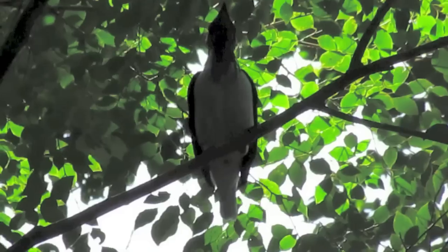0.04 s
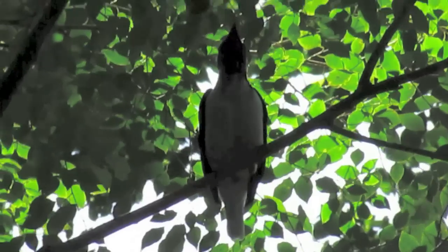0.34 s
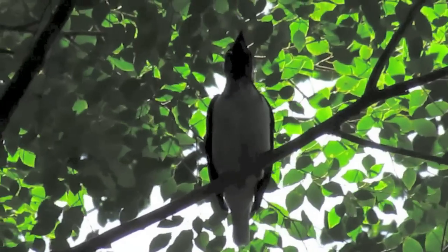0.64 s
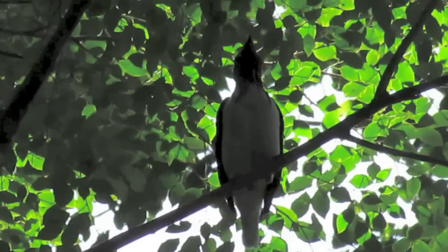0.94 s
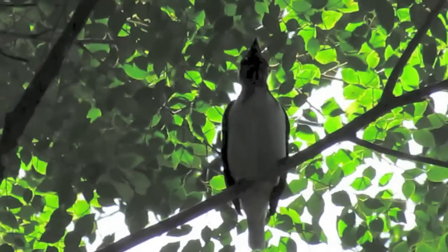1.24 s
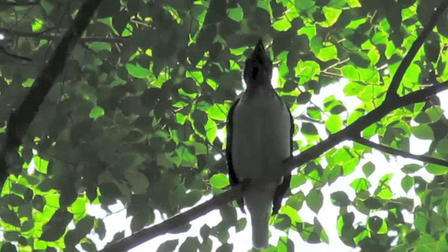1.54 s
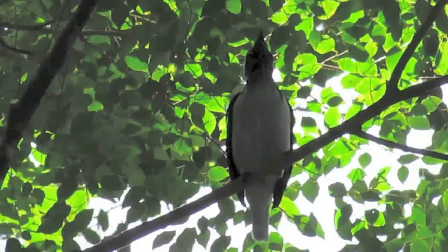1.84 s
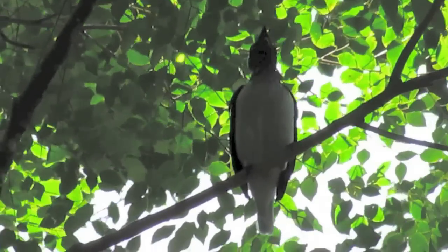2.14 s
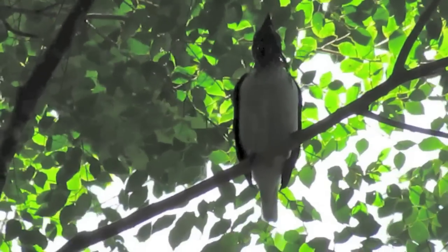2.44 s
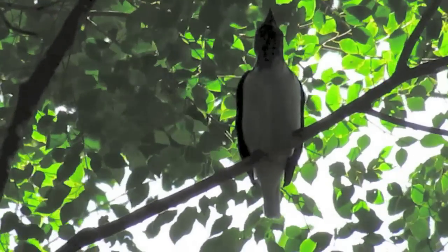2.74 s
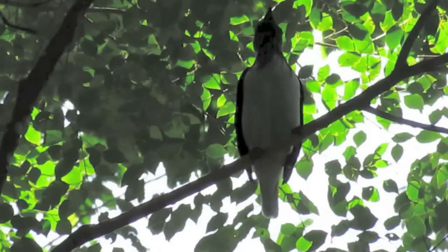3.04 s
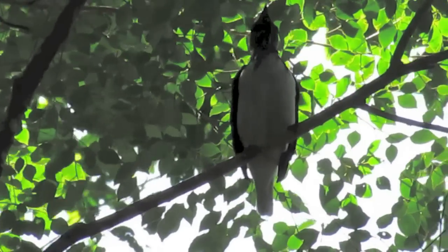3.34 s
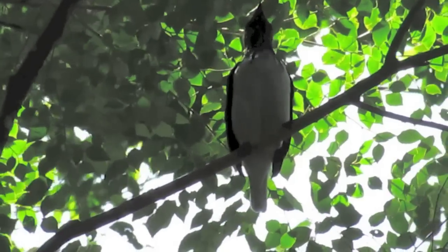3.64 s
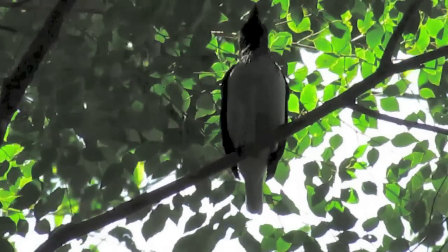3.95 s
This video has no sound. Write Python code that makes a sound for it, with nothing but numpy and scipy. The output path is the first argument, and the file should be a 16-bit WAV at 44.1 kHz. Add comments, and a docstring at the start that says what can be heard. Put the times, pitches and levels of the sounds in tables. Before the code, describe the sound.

A bird clanks loudly twelve times, evenly from about 0.2 to 4 seconds, each call a hard clack with a short metallic ring and forest echo. A quieter bird pipes a short, high note roughly every 0.4 seconds, and a distant one answers faintly until 2.5 seconds. Leaves and insects hiss softly throughout, with two faint, dull knocks near 0.5 and 1.3 seconds.

```python
"""In a forest, a bellbird clanks from a branch about three times a second.
Each clank is a small tick, a hard clack and a short metallic ring of many partials, carried on by the
trees. Another caller pipes one pure note at its own pace, and a third answers far off.
Behind them leaves and insects hiss, and two soft knocks sound among the branches."""
import sys
import numpy as np
from scipy import signal
from scipy.fft import rfft, irfft
from scipy.io import wavfile

SR = 44100
rng = np.random.default_rng(int(sys.argv[2]) if len(sys.argv) > 2 else 0)


def dump(signal):
    """Clip the signal to [-1, 1] and save it as 16-bit WAV at the path in sys.argv[1]."""
    limited = np.clip(np.atleast_2d(signal).T, -1, 1)
    pcm = np.round(limited * 32767).astype(np.int16)
    wavfile.write(sys.argv[1], SR, pcm)


N = 176400
TIME = np.arange(N) / SR

# The bellbird's clanks. Each row: time of the clack in seconds, clack level in dB, ring level in dB.
CLANKS = [(0.2341, -4, -3), (0.5383, -0.5, -0.5), (.861, -1, -0.5), (1.1923, -0.5, 0), (1.536, -0.5, -0.5),
          (1.882, 0.5, -0.5), (2.228, 0, -1.5), (2.5851, 0, 0), (2.9319, -.5, -.5), (3.2868, 0.5, -0.5),
          (3.6356, -1, -1.5), (3.9908, 0.5, -1)]
# The colour of the rasp in its voice. Each row: frequency in Hz, relative level in dB.
RASP_COLOUR = [(300, -48), (800, -25.5), (1100, -11), (1400, -3.5), (1950, -6), (2300, -6.5), (2700, -3.5),
               (3250, -4.5), (3600, -4.5), (4100, -2.5), (4750, -9.5), (5300, -16.5), (8500, -20),
               (11000, -34.5), (15000, -58)]
RASP_DB, RASP_FADE_DB_PER_S, RASP_START_S = -26.5, 29, -.002


def bellbird():
    """Every clank is the same gesture: a clack, then a ring with a noisy rasp on it."""
    tones, rasp_gain = np.zeros((2, N)), np.zeros((2, N))
    t = np.arange(-.025, .2, 1 / SR)   # opens early to leave room for the tick
    rasp_shape = ring_envelope(t, RASP_START_S, RASP_FADE_DB_PER_S)[None]
    for s, clack_db, ring_db in CLANKS:
        add(tones, from_db(clack_db) * clack(t) + from_db(ring_db) * ring(t), s + t[0])
        add(rasp_gain, from_db(ring_db + RASP_DB) * rasp_shape, s + t[0])
    return tones + rasp_gain * diffuse_noise(RASP_COLOUR)


# The tick's three sweeps. Each row: half length in ms, start and end pitch in Hz, level and pan in dB.
TICK_SWEEPS = [(1.5, 3950, 3763, -21, 4.5), (1.7, 2550, 2150, -19.5, -2), (2.0, 1397, 1207, -22.5, 0.5)]
# How far each of them comes ahead of the clack, in ms.
TICK_LEAD_MS = (13.0, 12.2, 9.6)
# The clack and its rebound. Each row: centre and half length in ms, start and end pitch in Hz,
# level and pan in dB.
CLACK_SWEEPS = [(0.53, 2.17, 1273, 1750, -14.5, -1.5), (0.94, 2.26, 2480, 2250, -12, -1),
                (0.14, 2.0, 3520, 3650, -12.5, 3), (2.3, 2.07, 4020, 3820, -18.5, 6.5),
                (8.7, 1.83, 2400, 2100, -22, -2), (9.23, 1.9, 3650, 3430, -22.5, 7)]
BRANCH_ECHO_S, BRANCH_ECHO_DB = .005, -12


def clack(t):
    """Tick and clack: tiny bursts sweep through the voice's three registers, with one close echo."""
    out = 0
    tick = [(-lead_ms, *row) for lead_ms, row in zip(TICK_LEAD_MS, TICK_SWEEPS)]
    for centre_ms, half_ms, start_hz, end_hz, db, pan_db in tick + list(CLACK_SWEEPS):
        u = (t * 1000 - centre_ms) / half_ms
        hz = start_hz + (end_hz - start_hz) * (np.clip(u, -2, 2) + 1) / 2
        burst = np.exp(-u * u / 2 - (u / 2) ** 4)
        out = out + panned(sine(hz) * burst * from_db(db + rng.normal(0, 0.48)), pan_db)
    return out + from_db(BRANCH_ECHO_DB) * np.roll(out, int(BRANCH_ECHO_S * SR), axis=1)


# The metallic ring. Each row: pitch in Hz, level in dB, start in ms after the clack,
# fade in dB per second, pan in dB.
RING_PARTIALS = [(1258, -28, 5.1, 68, -2), (1350, -22, 7.5, 23, 0), (1453, -23.5, 5, 49, -1),
                 (1525, -28.5, 3.4, 107, -9), (1642, -30.5, 11, 107, 3), (1728, -34, 5.2, 110, -7),
                 (2246, -30.5, 3.9, 120, -7), (2316, -32.5, 5, 122, 5), (2310, -32, 6.2, 125, -2),
                 (2965, -29, 6.9, 28, 7), (3082, -21, 7.2, 27, 6.5), (3442, -30.5, 8.5, 107, 6),
                 (3968, -29, 7.6, 85, 9), (4200, -44, 19, 20, -4), (4440, -33.5, 9.5, 24, -1),
                 (4560, -39.5, 10, 11, 6), (4808, -34.5, 24, -3, 10)]
RING_ATTACK_S, RING_HOLD_END_S, RING_RELEASE_S = 0.0026, 0.052, 0.022
RING_SAG_PER_S, PITCH_SCATTER, PITCH_WAVER, PARTIAL_SCATTER_DB = 0.099, .002, 0.0046, 1.27


def ring(t):
    """Close partials beat against each other and sag slightly in pitch."""
    out = 0
    sag = RING_SAG_PER_S * (t - RING_HOLD_END_S / 2)
    for hz, db, start_ms, fade_db_per_s, pan_db in RING_PARTIALS:
        bend = 1 - sag + PITCH_SCATTER * rng.normal() + PITCH_WAVER * drift(t, 150)
        partial = sine(hz * bend) * ring_envelope(t, start_ms / 1000, fade_db_per_s)
        out = out + panned(partial * from_db(db + PARTIAL_SCATTER_DB * rng.normal()), pan_db)
    return out


def ring_envelope(t, start_s, fade_db_per_s):
    """A quick attack, a sloping hold and a short release."""
    release = np.exp(-np.maximum(t - RING_HOLD_END_S, 0) / RING_RELEASE_S)
    return ramp((t - start_s) / RING_ATTACK_S) * from_db(-fade_db_per_s * (t - start_s)) * release


# The second caller's notes. Each row: start in seconds, length in seconds, level in dB.
NEAR_NOTES = [(0.138, 0.083, -24), (.519, 0.08, -21.5), (0.906, 0.096, -22), (1.29, 0.088, -20.5),
              (1.668, 0.091, -20), (2.045, 0.098, -20.5), (2.431, 0.075, -18), (2.827, 0.074, -18.5),
              (3.208, .082, -19.6), (3.595, .082, -19.2)]
# The far answers. Each row: start in seconds, length in seconds, level in dB.
FAR_NOTES = [(.16, 0.079, -33.5), (.6, 0.088, -34), (1.05, 0.064, -38), (1.49, 0.091, -38),
             (1.61, .07, -41), (1.95, 0.092, -39), (2.41, 0.047, -37)]
NEAR_HZ, FAR_HZ, PIPE_ARCH_HZ = 2888.3, 2710, 54
PIPE_ECHO_S, PIPE_ECHO_DB, PIPE_SEND_DB = .11, -17.5, -0.5


def piper(notes, top_hz, pan_db):
    """A caller pipes pure, slightly unsteady notes that arch a little in pitch, each with one echo."""
    out = np.zeros((2, N))
    for s, length_s, db in notes:
        u = np.arange(int(length_s * SR)) / (length_s * SR)
        hz = top_hz - PIPE_ARCH_HZ * (2 * (u - .38)) ** 2 + 9 * drift(u, 14.8)
        waver = drift(u, 12.8)
        envelope = ramp(u / .24) * ramp((1 - u) / 0.28) * from_db(db + 1.8 * (waver - waver.mean()))
        note = sine(hz) * envelope
        add(out, panned(note, pan_db), s)
        add(out, panned(note, 0) * from_db(PIPE_ECHO_DB), s + PIPE_ECHO_S)
    return out


# The colour of the sound the trees scatter. Each row: frequency in Hz, level in dB.
TAIL_COLOUR = [(500, -17), (1250, -12), (1360, -12.5), (1450, -3.5), (1700, -5), (2300, -8.5), (2880, -6),
               (3080, -7), (3600, -4), (4000, -6), (4500, -3.5), (4800, 2), (5500, 5), (8000, 2.5)]
# How long it hangs on. Each row: frequency in Hz, seconds to fall by 60 dB.
TAIL_T60 = [(500, 0.81), (1400, 0.92), (2400, 1), (3500, 1.25), (4800, 0.98), (9000, 0.23)]
PREDELAY_S, TAIL_BUILD_S, LEAF_SWAY_S = 0.022, 0.019, .36


def forest_tail():
    """Trunks and leaves return a dense tail that dies band by band."""
    t, edges = TIME[:SR], np.geomspace(400, 14000, 11)
    hz = np.arange(len(t) // 2 + 1) * SR / len(t)
    white = diffuse_noise([(20, 0), (20000, 0)])[:, :len(t)]
    spectrum = rfft(white) * from_db(at_hz(TAIL_COLOUR, hz))
    build = ramp((t - PREDELAY_S) / TAIL_BUILD_S)
    tail = 0
    for low, high in zip(edges, edges[1:]):
        band = irfft(spectrum * ((hz >= low) & (hz < high)), len(t))
        envelope = build * from_db(-60 * t / at_hz(TAIL_T60, np.sqrt(low * high)))
        tail = tail + band * envelope / np.linalg.norm(envelope)
    return tail


def forest(calls, patterns=4):
    """The foliage moves, so the calls fade from one pattern of reflections into the next."""
    out = 0
    for k in range(patterns):
        away = np.abs((TIME / LEAF_SWAY_S - k + patterns / 2) % patterns - patterns / 2)
        send = calls.mean(0) * np.sqrt(ramp(1 - away))   # equal-power crossfade
        out = out + signal.fftconvolve(send[None], forest_tail(), axes=1)[:, :N]
    return out


# The bed of leaves and insects. Each row: frequency in Hz, relative level in dB.
HISS_COLOUR = [(25, -5), (60, -5), (120, -7), (300, -4), (800, -5.5), (1150, -4), (1600, 4), (2000, -0.5),
               (2900, 7), (3700, 7.5), (4500, 2.5), (5300, -3), (6100, -2), (7000, -4), (9000, -4.5),
               (10500, -15.5), (12400, -16), (14500, -29)]
HISS_DB, HISS_START_S, HISS_RISE_S = -37.5, 0.092, 0.094


def hiss():
    """Leaves and insects make a nearly steady bed that fades in at the start."""
    leaves = from_db(HISS_DB + 0.58 * drift(TIME, 5.64)) * diffuse_noise(HISS_COLOUR)
    fade_in = np.clip((TIME - HISS_START_S) / HISS_RISE_S, 0, 1)
    return (leaves + insect_buzz()) * fade_in


# The shrill top of the insects. Each row: frequency in Hz, relative level in dB.
BUZZ_COLOUR = [(5000, -29), (6200, -1.5), (7000, -6.5), (9000, -9.5), (10600, -23), (11500, -7),
               (12300, -4), (13100, -7.5), (13700, -21), (14500, -40)]
BUZZ_DB, BUZZ_PULSES_PER_S, BUZZ_PULSE_DB = -50.5, 135, 4
DIP_DB, DIP_WIDTH_S, DIP_DELAY_S = 7, .034, .05


def insect_buzz():
    """A very high, finely pulsed buzz that ducks under each of the near piper's notes."""
    dips = sum(np.exp(-((TIME - s - DIP_DELAY_S) / DIP_WIDTH_S) ** 2 / 2) for s, _, _ in NEAR_NOTES)
    wander = drift(TIME, 12)
    pulses = np.sin(2 * np.pi * np.cumsum(BUZZ_PULSES_PER_S * (1 + 0.039 * wander)) / SR)
    level_db = BUZZ_DB - DIP_DB * dips + BUZZ_PULSE_DB * pulses + wander
    return left_late(diffuse_noise(BUZZ_COLOUR), lag_s=.0001) * from_db(level_db)


# Soft knocks. Each row: start in seconds, level in dB, centre frequency in Hz, decay in seconds.
KNOCKS = [(0.489, -47, 209, 0.036), (1.254, -36.5, 485, 0.0064)]


def knocks():
    """Dull, quickly dying thuds among the branches."""
    out = 0
    for s, db, hz, decay_s in KNOCKS:
        age = np.maximum(TIME - s, 0)
        thud = diffuse_noise([(hz / 4, -20), (hz / 2, -3), (hz * 1.25, 0), (hz * 4, -22), (hz * 20, -60)])
        out = out + thud * from_db(db) * ramp(age / 0.0032) * np.exp(-age / decay_s)
    return out


# The stereo width of the noise. Each row: frequency in Hz, left-right correlation from -1 to 1.
NOISE_LIKENESS = [(40, 0.23), (250, 0.58), (700, 0.62), (1400, 0.64), (2500, 0.79), (4000, 0.16),
                  (8000, -0.6), (13000, 0)]
# The side it leans to. Each row: frequency in Hz, pan in dB.
NOISE_PAN = [(60, -1), (300, 0.5), (1300, -1.5), (2500, -2.5), (4000, 3.5), (6000, -1.5), (8000, -7.5),
             (13000, 0.5)]


def diffuse_noise(colour):
    """Coloured stereo noise at rms 1, narrower in the mids and wide in the treble."""
    hz = np.arange(N // 2 + 1) * SR / N
    mid, side = rfft(rng.standard_normal((2, N)))
    alike = np.clip(at_hz(NOISE_LIKENESS, hz), -.99, .99)
    stereo = np.sqrt(1 + alike) * mid + np.sqrt(1 - alike) * side * [[1], [-1]]
    noise = irfft(panned(stereo, at_hz(NOISE_PAN, hz)) * from_db(at_hz(colour, hz)), N)
    return noise / noise.std()


def sine(hz):
    """A tone that follows a pitch curve from a random phase."""
    return np.sin(2 * np.pi * (np.cumsum(hz) / SR + rng.random()))


def from_db(db):
    """Decibels to gain."""
    return 10 ** (np.asarray(db) / 20)


def at_hz(points, hz):
    """Read a curve on a log-frequency axis."""
    freqs, values = np.transpose(points)
    return np.interp(np.log(np.maximum(hz, 1)), np.log(freqs), values)


def panned(x, pan_db):
    """Place a sound in stereo; the pan is left level over right."""
    return x * from_db(np.array([[.5], [-.5]]) * pan_db)


def left_late(x, lag_s):
    """The sound reaches the left microphone a little later."""
    return np.array([np.interp(TIME - round(lag_s * SR) / SR, TIME, x[0], left=0), x[1]])


def add(out, x, s):
    """Mix a sound in at s seconds."""
    i = max(int(s * SR), 0)
    out[:, i:i + x.shape[1]] += x[:, :max(N - i, 0)]


def ramp(u):
    """Smooth step from 0 to 1."""
    return np.sin(np.clip(u, 0, 1) * np.pi / 2) ** 2


def drift(t, rate):
    """A random wander with a spread near 1 and `rate` turns per unit of t."""
    values = rng.standard_normal(1024)
    return np.interp((t - t[0]) * rate, np.arange(len(values)), values)


def scene():
    """Three callers among the trees, over the hiss and the knocks."""
    clanks = bellbird()
    pipes = piper(NEAR_NOTES, NEAR_HZ, pan_db=4) + piper(FAR_NOTES, FAR_HZ, pan_db=0)
    direct = left_late(clanks + pipes, lag_s=.00005)
    reverb = forest(clanks + from_db(PIPE_SEND_DB) * pipes)
    return direct + reverb + hiss() + knocks()


def record(dry):
    """A steep low-pass cuts the top above 14.5 kHz."""
    return signal.sosfilt(signal.ellip(10, .1, 80, 14500, fs=SR, output="sos"), dry)


dry = scene()
out = record(dry)
dump(out)
```